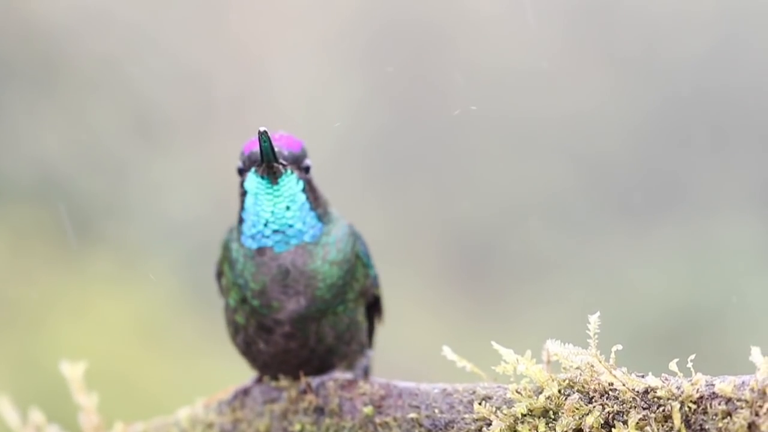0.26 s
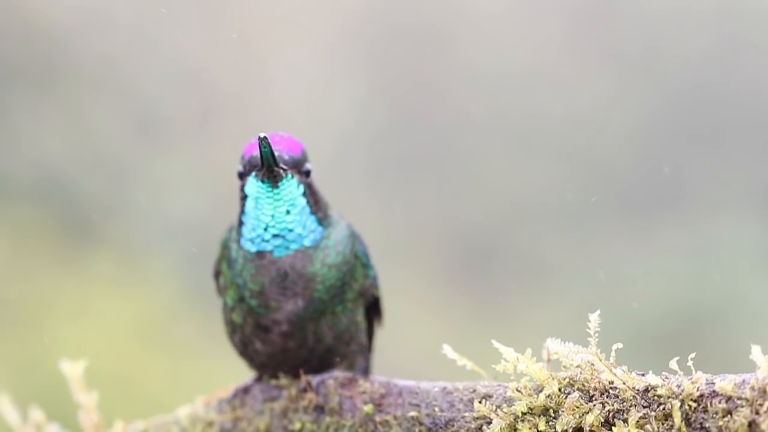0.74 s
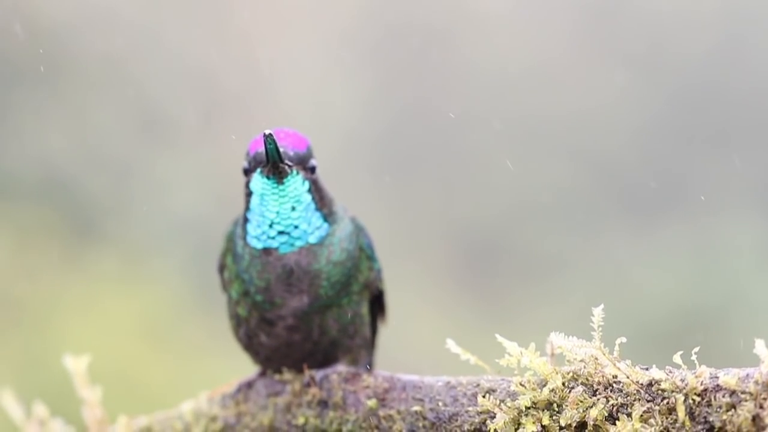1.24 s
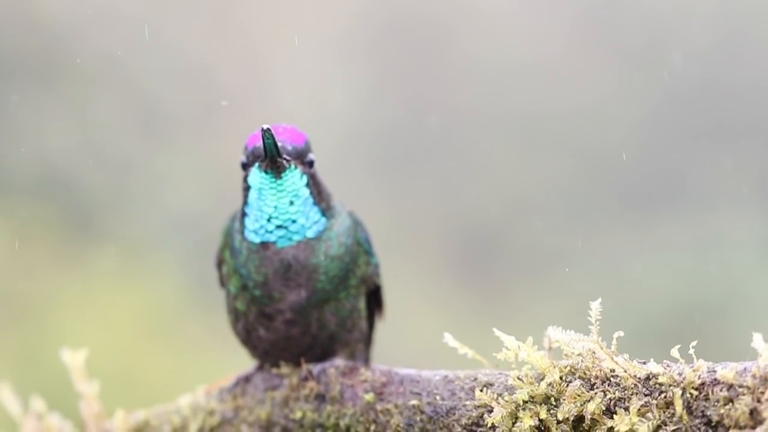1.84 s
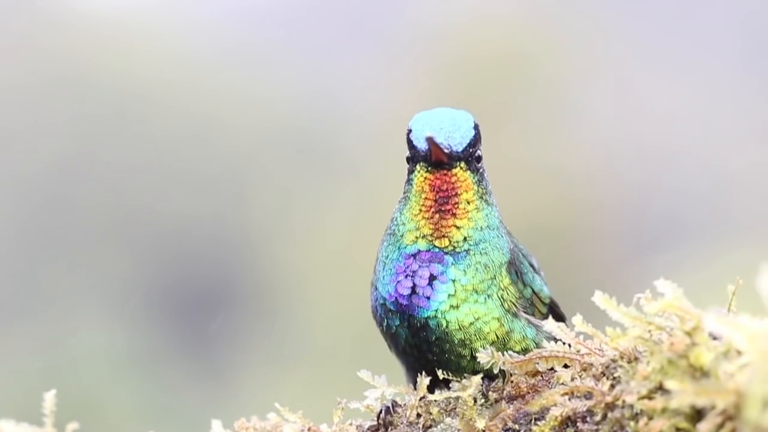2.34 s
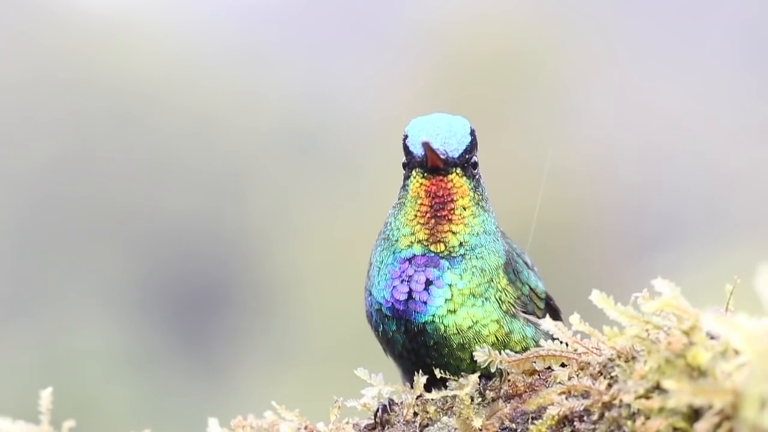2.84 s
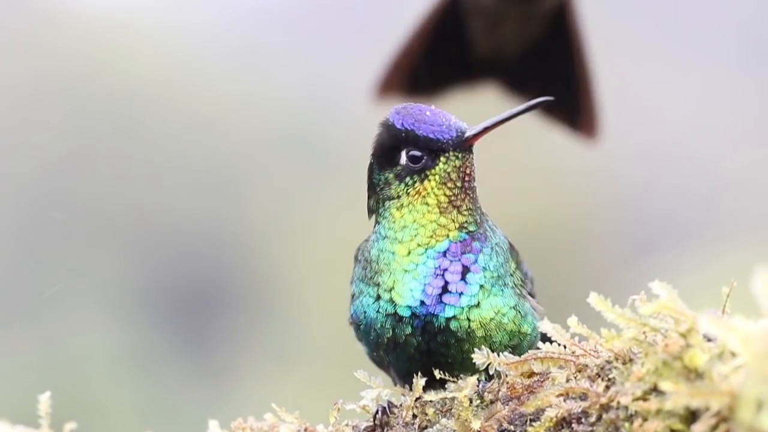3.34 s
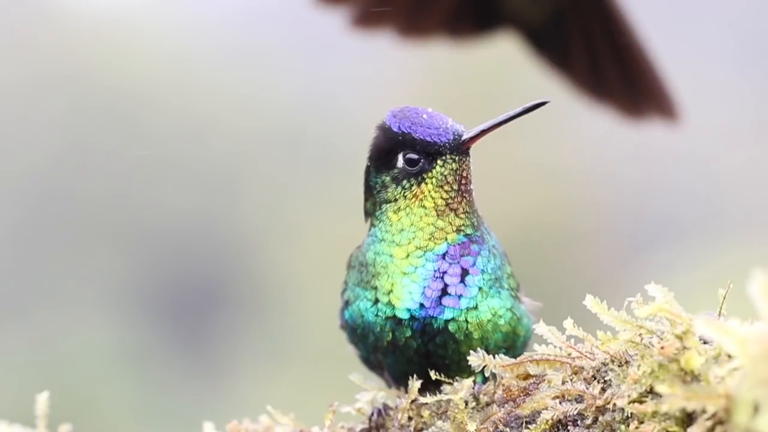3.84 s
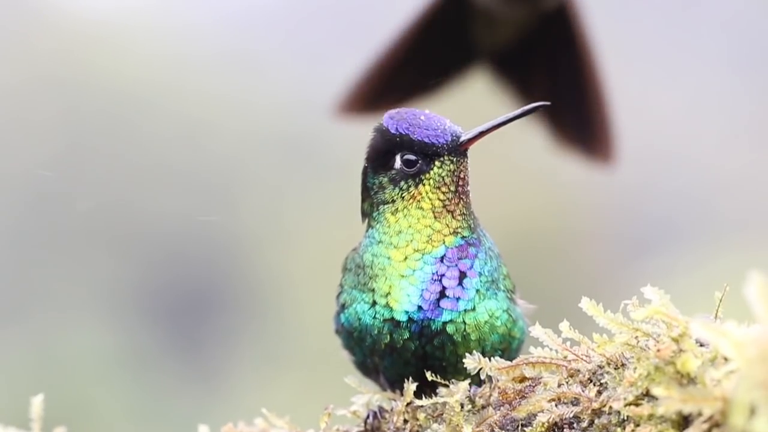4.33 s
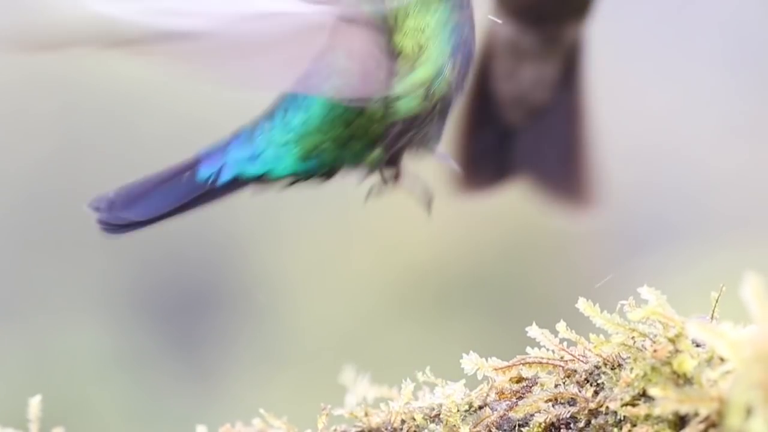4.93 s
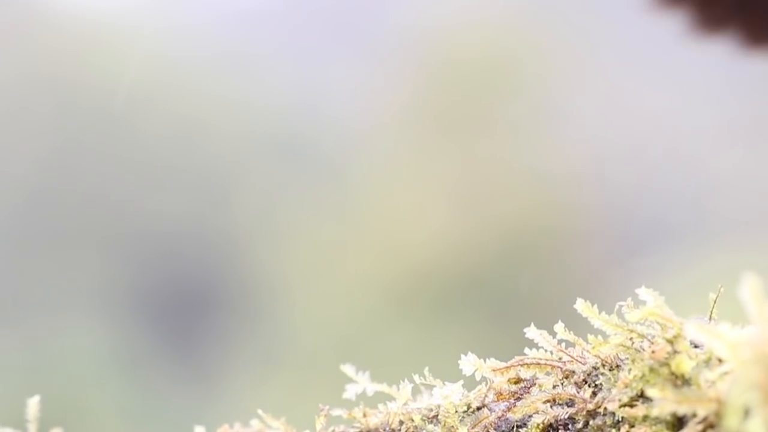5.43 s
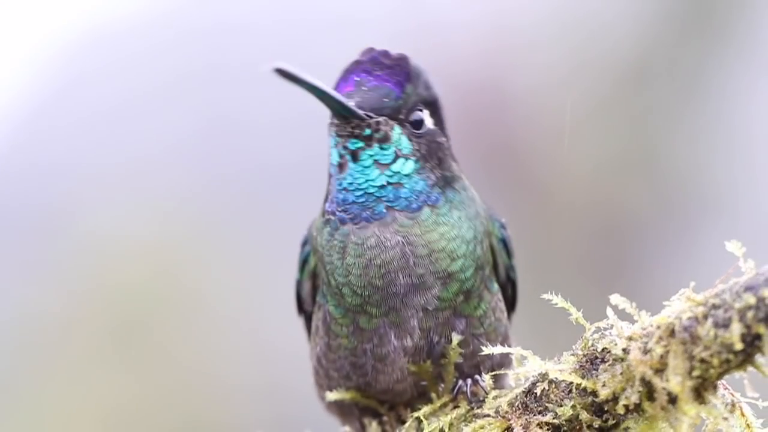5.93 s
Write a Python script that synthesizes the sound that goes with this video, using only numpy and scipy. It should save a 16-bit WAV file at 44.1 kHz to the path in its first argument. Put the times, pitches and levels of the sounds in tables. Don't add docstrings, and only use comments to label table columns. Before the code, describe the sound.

Soft, even forest rain with crisp single drops ticking on twigs, bark and leaves left and right, while small birds chip and whistle faintly.

```python
import sys
import numpy as np
from scipy import signal
from scipy.io import wavfile

SR = 44100
rng = np.random.default_rng(int(sys.argv[2]) if len(sys.argv) > 2 else 0)


def waveform_to_disk(signal):
    frames = np.transpose(np.atleast_2d(signal))
    scaled = np.clip(frames, -1, 1) * 32767
    samples = np.round(scaled).astype(np.int16)
    wavfile.write(sys.argv[1], SR, samples)


def magnitude_from_level(level_db):
    exponent = np.asarray(level_db, float) / 20
    return 10 ** exponent


N = 272538


def rms_one(x):
    return x / np.sqrt(np.mean(x ** 2) + 1e-20)


def at_hz(points, hz):
    table = np.array(points)
    return np.interp(np.log(hz), np.log(table[:, 0] + 1), table[:, 1])


def band(x, low_hz, high_hz):
    sos = signal.butter(2, [low_hz, min(high_hz, .45 * SR)], "band", fs=SR, output="sos")
    return signal.sosfilt(sos, x)


def cut(x, hz, width_hz, db):
    r, w = np.exp(-np.pi * width_hz / SR), 2 * np.pi * hz / SR
    peak = signal.lfilter((1 - r * r) / 2 * np.array([1, 0, -1]), [1, -2 * r * np.cos(w), r * r], x)
    return x + (magnitude_from_level(db) - 1) * peak


def drift(rate):
    r = np.exp(-80 * np.pi * rate / SR)
    slow = signal.lfilter([1], [1, -2 * r, r * r], rng.standard_normal(N // 40 + 2002))[2000:]
    return np.interp(np.arange(N) / 40, np.arange(len(slow)), rms_one(slow))


def sides(pan_db):
    return magnitude_from_level(np.minimum([[pan_db], [-pan_db]], 0))


# (frequency [Hz], likeness [-1 to 1])
LIKENESS = [(40, .66), (110, .46), (250, .02), (1200, .08), (2000, .2), (3300, .26), (4300, .02),
            (5200, -.4), (6200, -.4), (7300, .1), (9800, .36), (12800, .14), (14300, .3), (15700, .5)]
# (frequency [Hz], left over right [dB])
TILT = [(60, 1), (110, 3), (200, 1), (380, 1.0), (700, 2), (1290, 0.5), (2380, 0.5), (4400, 1),
        (8120, -0.5), (15000, -1)]


def shower(spectrum, per_s, spread_db, grain_share, patchy_db, gust):
    run_in = 8192
    low_hz, top_hz = spectrum[0][0], spectrum[-1][0]
    edges = np.geomspace(low_hz, top_hz, num=int(3.5 * np.log2(top_hz / low_hz)) + 2)
    sizes = magnitude_from_level(spread_db * np.minimum(rng.exponential(1, (2, 2, N)), 4))
    sizes = sizes * np.sign(rng.random((2, 2, N)) - .5)
    grains = rms_one(sizes * (rng.random((2, 2, N)) < per_s / SR))
    far_rain = np.sqrt(1 - grain_share) * rng.standard_normal((2, 2, N))
    out = 0
    for k, (low, high) in enumerate(zip(edges, edges[1:])):
        hz = np.sqrt(low * high)
        likeness = at_hz(LIKENESS, hz)
        alike = np.clip(likeness / (1 - grain_share), -.95, .95)
        mid, side = far_rain[k % 2] * np.sqrt([[(1 + alike) / 2], [(1 - alike) / 2]])
        pair = np.array([mid + side, mid - side]) + np.sqrt(grain_share) * grains[k // 5 % 2]
        level_db = at_hz(spectrum, hz) + patchy_db * (0.74 * gust + drift(22.4))
        gain = magnitude_from_level(level_db) / np.sqrt(1 + likeness)
        tilt = magnitude_from_level(at_hz(TILT, hz) * np.array([[.5], [-.5]]))
        sound = band(np.c_[pair[:, -run_in:], pair], low, high)[:, run_in:]
        out = out + gain * tilt * sound
    return out / np.sqrt(np.mean(out.mean(axis=0) ** 2))


# (frequency [Hz], level per Hz [dB])
RUMBLE = [(12, -35), (20, -3.5), (66, 3.5), (92, 2.5), (151, -18), (200, -9), (260, -29), (440, -120)]


def low_rumble():
    return magnitude_from_level(-62) * shower(RUMBLE, per_s=26.0, spread_db=5.0, grain_share=0.039, patchy_db=1.3, gust=drift(3.8))


# (time [s], level [dB])
RAIN = [
    (0.0, -45),
    (0.48, -44.5),
    (0.89, -46),
    (1.26, -45),
    (2.15, -44),
    (2.46, -46.5),
    (2.79, -45.5),
    (2.89, -46),
    (5.39, -46),
    (6.18, -45.5),
]


def rain_swing_db():
    swing_db = np.interp(np.arange(N) / SR, *np.transpose(RAIN))
    return swing_db - swing_db.mean()


# (frequency [Hz], level per Hz [dB])
HISS = [(3240, -34), (5500, -7), (6090, -2), (10700, 4.5), (13500, -1.5), (15100, -8), (15800, -15)]


def canopy_hiss(swing_db, gust):
    hiss = shower(HISS, per_s=500., spread_db=10.0, grain_share=0.092, patchy_db=1.22, gust=gust)
    return magnitude_from_level(-52. + swing_db) * hiss


# (frequency [Hz], level per Hz [dB])
PATTER = [(110, -43), (190, -6.5), (358, 0.5), (514, -1.5), (1010, -1.5), (1290, -2.5), (3150, 0),
          (4450, -2.5), (6020, -11), (7000, -10.5), (9100, -15), (15400, -120)]


def leaf_patter(swing_db, gust):
    patter = shower(PATTER, per_s=400., spread_db=4.5, grain_share=0.1, patchy_db=0.88, gust=gust)
    return magnitude_from_level(-46. + 0.62 * swing_db) * patter


# (time [s], length [s], start frequency [Hz], end frequency [Hz], level [dB])
NOTES = [
    (3.158, .02, 2840, 2750, -50.),
    (3.185, .035, 2420, 2400, -51.),
    (3.355, 0.061, 3190, 3110, -48),
    (3.54, .025, 3230, 3130, -49.),
    (3.6, 0.038, 2650, 2630, -47.5),
    (5.68, 0.028, 3500, 3450, -42),
    (6.047, .03, 2710, 2810, -46),
    (6.056, 0.011, 2250, 2260, -45),
    (6.058, .065, 3110, 3260, -45),
    (6.061, .12, 3350, 3365, -44),
]
# (time [s], level [dB], left over right [dB])
CHIPS = [
    (.022, -46.5, 5),
    (.967, -45, 4),
    (1.466, -44.5, 6),
    (3.503, -47, 2.1),
    (4.215, -46.5, .1),
    (4.809, -44.5, 2.4),
    (5.174, -46., 3),
    (5.729, -43, 4),
]
# (time into the chip [s], frequency [Hz])
CHIP_PITCH = [(0, 4690), (.008, 4040), (.018, 4220), (.034, 4250)]


def birds(wobble, flutter_db, echo_db):
    attack_s, whistler_pan_db = 0.0053, 1.5
    out = np.zeros((2, N + SR))
    waver, flutter = drift(120.0), magnitude_from_level(flutter_db * drift(74.0))
    calls = [chip + (CHIP_PITCH,) for chip in CHIPS]
    for s, length, start_hz, end_hz, db in NOTES:
        pitch = [(0, start_hz), (length / 3, (start_hz + end_hz) / 2), (length, end_hz)]
        calls.append((s, db, whistler_pan_db, pitch))
    for s, db, pan_db, pitch in calls:
        length = pitch[-1][0]
        at = np.arange(round(s * SR), min(round((s + length) * SR), N))
        t = at / SR - s
        hz = np.interp(t, *np.transpose(pitch)) * (1 + wobble * waver[at])
        shape = np.minimum(t / attack_s, 1) * (1 - np.clip(t / length, 0, 1)) ** 0.65
        tone = np.sin(2 * np.pi * np.cumsum(hz) / SR)
        out[:, at] += magnitude_from_level(db) * sides(pan_db) * shape * flutter[at] * tone
    lags = (rng.uniform(0.0034, 0.054, (2, 5)) * SR).astype(int)
    echoes = [sum(np.roll(out[c], lag) * magnitude_from_level(-150 * lag / SR) for lag in lags[c]) for c in (0, 1)]
    return np.sqrt(2) * (out + magnitude_from_level(echo_db) * np.array(echoes))[:, :N]


# (time [s], peak level [dB], centre frequency [Hz], left over right [dB])
ON_TWIGS = [(.5207, -32, 880, -4), (1.0462, -29, 1900, -5), (1.0575, -22, 1440, 9), (1.26, -31, 1370, 7),
            (1.4332, -24, 4750, -8), (1.754, -33, 840, -9), (1.876, -28, 560, 3),
            (2.5236, -16.5, 2200, -12), (2.822, -38, 139, -1), (2.8561, -25.5, 1950, 14),
            (3.3514, -32, 1730, 7), (3.9983, -30, 800, 9), (4.6826, -7.5, 3470, 13),
            (4.9941, -21, 3230, -10), (5.1276, -31.5, 696, 1), (5.2395, -21, 503, 10),
            (1.1245, -31, 2050, 3), (5.5094, -29, 2640, -9), (5.6833, -30.5, 1330, 12),
            (5.7215, -29, 780, 18), (5.8875, -28.5, 720, 6)]
# (time [s], peak level [dB], centre frequency [Hz], left over right [dB])
ON_BARK = [(.1774, -26.5, 990, 6), (.3582, -22, 6080, 5), (.5515, -21, 5400, -2), (.649, -25, 4620, -6),
           (1.1135, -13, 9500, 10), (1.5278, -29, 2880, 6), (1.6118, -27, 1590, -12),
           (2.0028, -24.5, 2060, -12), (2.7617, -22, 3900, 5), (2.7674, -30, 1610, 19),
           (2.8638, -30, 2340, 10), (2.936, -29, 2120, -8), (3.4424, -30, 1240, 12), (3.7338, -34, 1080, 4),
           (3.947, -27, 5920, -6), (4.0379, -32, 1190, 12), (4.343, -22, 5910, -11),
           (4.7209, -26, 1030, 17), (1.1095, -25, 3000, 4), (5.3262, -30.5, 1560, 5),
           (5.8873, -20, 5270, 3)]
# (time [s], peak level [dB], centre frequency [Hz], left over right [dB])
ON_BROAD_LEAVES = [(.0708, -18.5, 3480, -7.5), (.2538, -26, 3270, 3), (.4766, -19, 4700, 8),
                   (.5574, -12.5, 1440, -23), (.7146, -20.5, 2320, 3), (1.1646, -21, 2320, 10),
                   (1.2805, -21, 4670, -9), (1.3076, -28, 4100, .1), (1.5465, -29.5, 3550, 2),
                   (1.6348, -25, 3400, 11), (1.6522, -25, 1730, 8), (1.6802, -20.5, 2880, -14),
                   (1.7106, -21.5, 5150, -3.5), (1.7446, -18, 3880, -10), (1.8755, -18, 1690, 1),
                   (1.923, -26.5, 1000, 13), (2.1171, -25, 3140, 2), (2.7776, -18, 5850, 16),
                   (2.8365, -32, 1850, -9), (2.9961, -21.5, 1840, 10), (3.65, -23, 4120, -8),
                   (4.3503, -23, 2340, 14), (4.5028, -21.5, 3740, -7), (5.1357, -25.5, 4750, 2),
                   (5.2417, -18.5, 1500, 15), (5.2488, -22, 3140, -2.5), (5.4455, -34, 4090, 11),
                   (6.0677, -27.5, 1430, -3)]
# (time [s], peak level [dB], centre frequency [Hz], left over right [dB])
ON_SMALL_LEAVES = [
    (.0493, -30, 9200, -4),
    (.2202, -26, 9400, 11),
    (.3753, -20, 9860, 4),
    (1.7291, -24, 7180, 6.5),
    (2.7823, -21, 8860, 4),
    (3.8591, -27, 9000, 12),
    (5.279, -27, 7040, -4),
    (5.4661, -18.5, 10900, 8),
]
# (time [s], peak level [dB], centre frequency [Hz], left over right [dB])
ON_WET_MOSS = [(.6024, -27, 2050, 6), (.6396, -27.5, 1450, 6), (1.066, -22, 3500, .1),
               (1.151, -30.5, 790, 3), (1.888, -23, 2770, 3), (2.194, -28, 1080, 2), (2.5337, -25, 3990, 4),
               (2.98, -29, 3570, 2), (3.5571, -26.5, 4740, -1), (3.63, -30, 6110, 3),
               (3.747, -30, 3640, -1), (4.2294, -28, 8550, .1), (4.426, -36, 1330, 7), (4.79, -24, 3530, 7),
               (5.1057, -28, 4090, -10), (5.2965, -34, 940, 5), (6.0582, -23, 3460, -2)]
# (drops, width of the sound [octaves], spray under the tap of a middling drop [dB])
SURFACES = [(ON_TWIGS, 0.86, -15.5), (ON_BARK, 2.34, -12.5), (ON_BROAD_LEAVES, 3.07, -15.5),
            (ON_SMALL_LEAVES, 1.5, -19), (ON_WET_MOSS, 1.95, -9.5)]


def near_drops(crack_db, rattle_db, rattle_s, echo_db, echo_s, splash_s):
    size = 2560
    lag_per_db = .25
    t, out = np.arange(size) / SR, np.zeros((2, N + size))
    struck = [(drop, octaves, spray_db) for table, octaves, spray_db in SURFACES for drop in table]
    for (s, db, hz, pan_db), octaves, spray_db in struck:
        low_hz, high_hz = hz / 2 ** (octaves / 2), hz * 2 ** (octaves / 2)
        hit, spray = rng.standard_normal((2, 2, size))
        hit *= magnitude_from_level(rattle_db - 0.45 * (db + 24.0)) * np.exp(-t / rattle_s)
        hit[:, 0] = -1
        pair = np.array([hit, spray])
        wide = band(pair, 0.68 * low_hz, 2.0 * high_hz)
        tap, spray = band(wide, low_hz, high_hz) + magnitude_from_level(crack_db) * pair
        tap = tap / np.abs(tap).max(axis=1, keepdims=True)
        echo = magnitude_from_level(echo_db) * np.roll(tap[::-1], round(echo_s * SR), axis=1)
        splash_db = spray_db - 0.5 * (db + 23)
        splash = magnitude_from_level(splash_db) * rms_one(spray) * (t / splash_s) ** .5 * np.exp(-t / splash_s)
        far = int(pan_db > 0)
        tap[far] = np.roll(tap[far], round(lag_per_db * abs(pan_db)))
        i = round(s * SR)
        out[:, i:i + size] += magnitude_from_level(db) * (tap * sides(pan_db) + echo + splash)
    return cut(out[:, :N], hz=6360.0, width_hz=4900.0, db=-4.0)


def scene():
    swing_db = rain_swing_db()
    gust = drift(13.3)
    bed = low_rumble() + canopy_hiss(swing_db, gust) + leaf_patter(swing_db, gust)
    calls = birds(wobble=0.008, flutter_db=2.5, echo_db=-7.0)
    near = near_drops(crack_db=-27.0, rattle_db=-8.5, rattle_s=0.0012, echo_db=-14.5, echo_s=.0027, splash_s=0.0096)
    return bed + calls + near


def roll_off(x):
    return signal.sosfilt(signal.butter(12, 15830, fs=SR, output="sos"), x)


def record(dry):
    mix = signal.sosfilt(signal.ellip(10, .5, 60, 15790, fs=SR, output="sos"), dry)
    return roll_off(mix)


dry = scene()
out = record(dry)
waveform_to_disk(out)
```